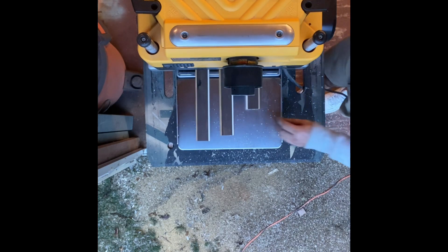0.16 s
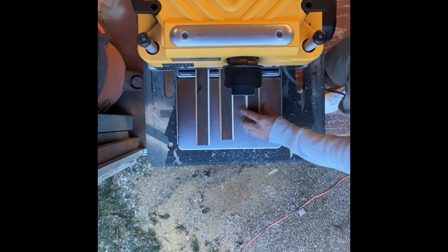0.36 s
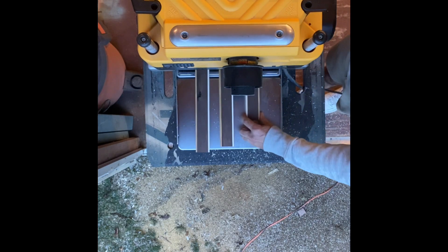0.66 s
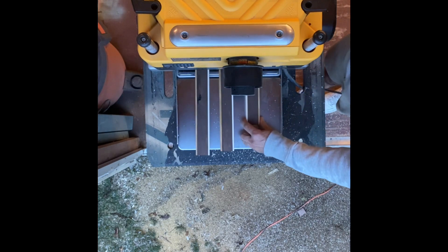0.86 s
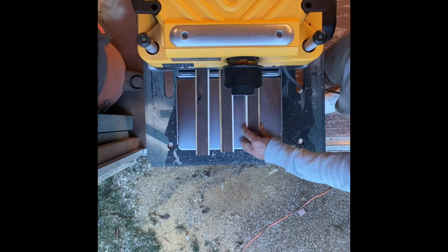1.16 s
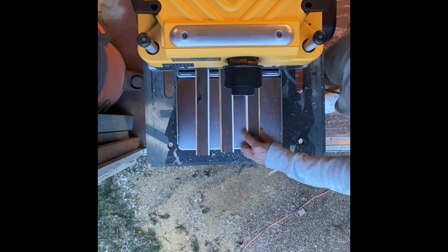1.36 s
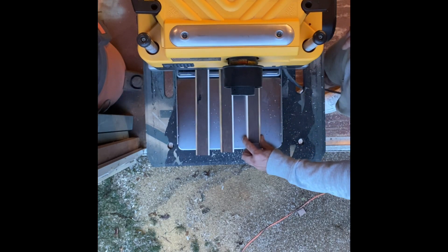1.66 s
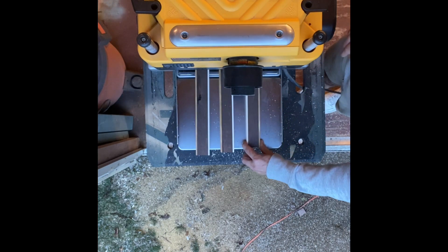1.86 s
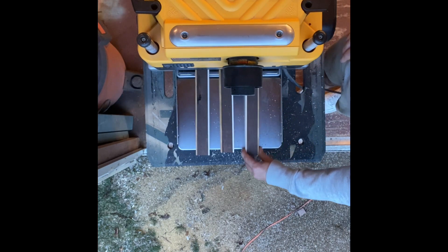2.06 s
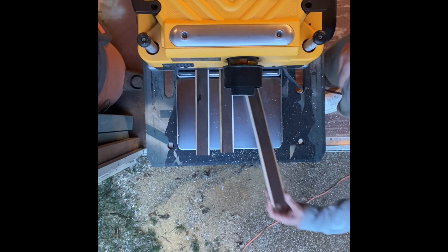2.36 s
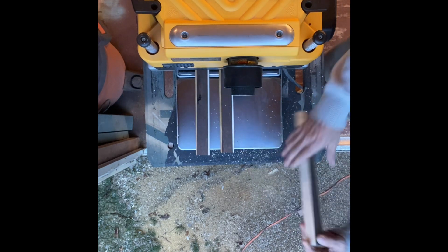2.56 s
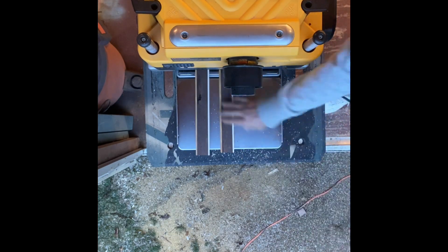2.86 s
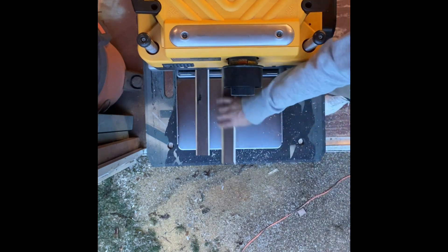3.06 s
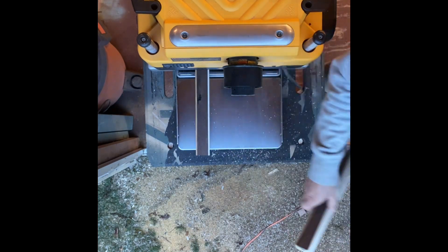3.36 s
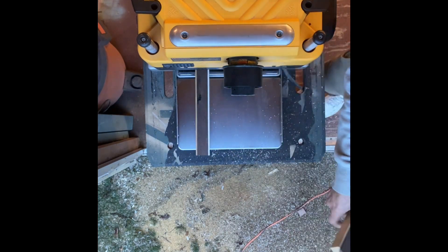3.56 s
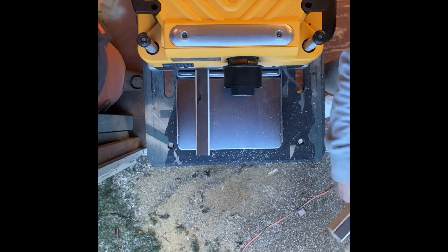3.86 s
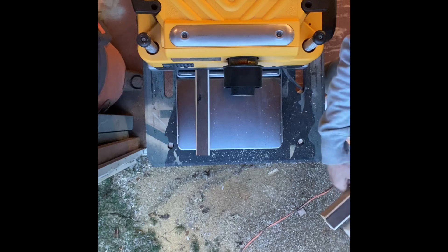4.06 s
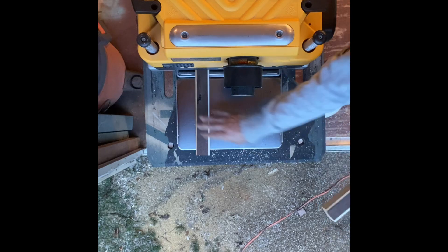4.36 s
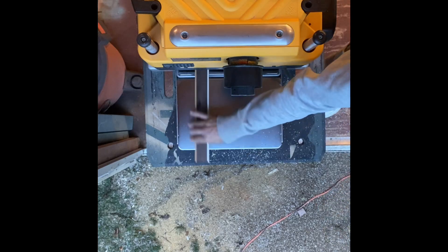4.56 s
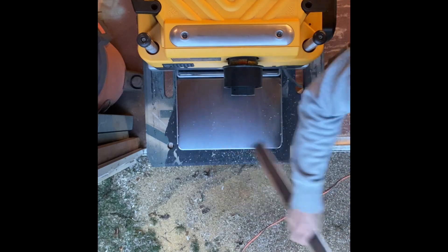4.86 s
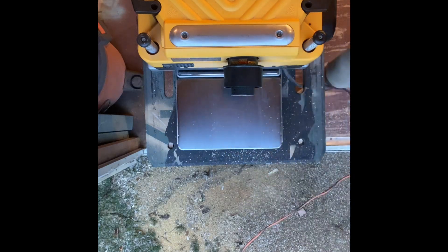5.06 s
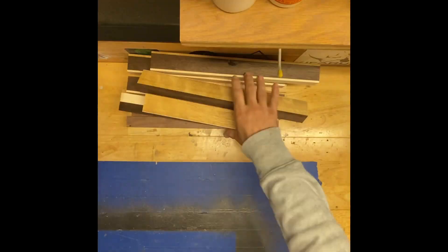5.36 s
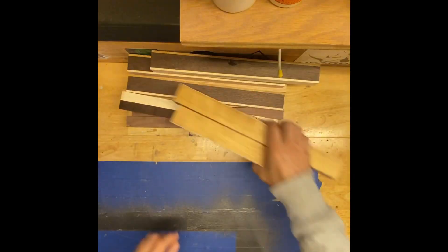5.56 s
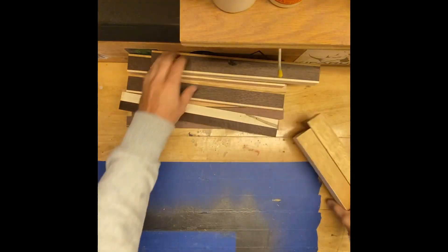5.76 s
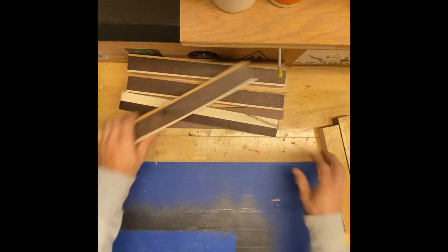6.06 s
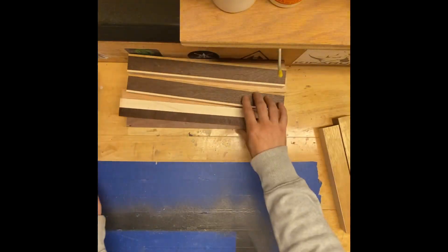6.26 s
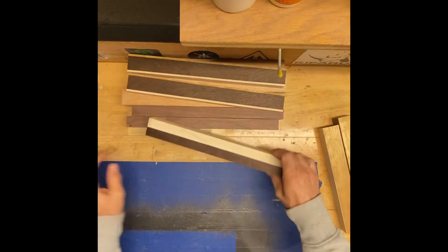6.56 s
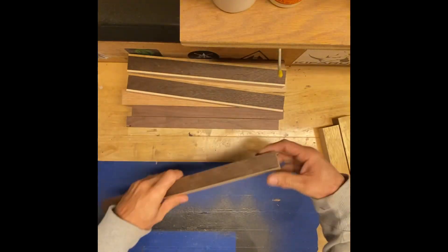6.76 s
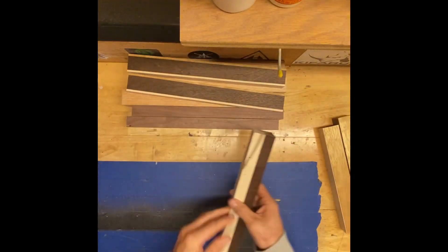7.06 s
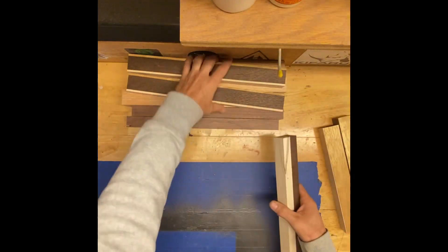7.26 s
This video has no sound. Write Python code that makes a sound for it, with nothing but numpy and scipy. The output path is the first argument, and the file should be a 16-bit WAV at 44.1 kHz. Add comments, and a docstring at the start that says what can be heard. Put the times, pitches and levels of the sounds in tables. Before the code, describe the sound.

Steady loud planer whine with rushing fan air and faint strip scrapes, suddenly replaced by hushed room tone and crisp, irregular wooden clacks.

```python
"""A benchtop thickness planer runs outdoors, heard from just above: three knives drone, the motor whines, the fan roars.
The scene then changes abruptly to a quiet workshop, where hardwood strips are slid, stacked and dropped on a bench.
Rotating parts are sines of wandering phase and level; moving air is shaped noise filtered by resonances.
Impacts are short noise and decaying modes; friction is band-passed grainy noise; both excite the room's echoes."""
import sys
import numpy as np
from scipy import signal
from scipy.fft import rfft, irfft
from scipy.io import wavfile

SR = 44100
rng = np.random.default_rng(int(sys.argv[2]) if len(sys.argv) > 2 else 0)


def to_wav(s):
    """Save 16-bit WAV."""
    ch = np.atleast_2d(s).T  # columns
    pcm = np.round(np.clip(ch, -1, 1) * 32767)  # PCM
    wavfile.write(sys.argv[1], SR, pcm.astype(np.int16))


N = 326781
TIME = np.arange(N) / SR
FREQ = np.fft.rfftfreq(N, 1 / SR)

# modes of the stack of strips and the bench: f/Hz, level/dB, t60/s
WOOD_MODES = [(134, -9.5, 0.055), (220, -11, 0.032), (315, -9, 0.036), (427, -5.5, 0.031), (623, -1, 0.01),
              (740, -2, 0.013), (940, -11, 0.028), (1180, -4, 0.016), (1632, -4.5, 0.018),
              (1810, 2.5, 0.01), (3700, 2, 0.015), (4130, -5, 0.027), (5660, 6, 0.0034), (6540, 1, 0.0062)]


def amp(db):
    """Level and amplitude: decibels to gain."""
    return np.exp(np.asarray(db) * (np.log(10) / 20))


def curves(table):
    """Linear interpolation: the columns of a table of (t/s, ..) rows, one value per sample."""
    s, *columns = np.transpose(table)
    return [np.interp(TIME, s, c) for c in columns]


def walk(rate):
    """Low-passed random process: smooth chance with spread 1 that changes about rate times a second."""
    step = 32  # samples between computed values
    coarse = TIME[::step]
    hz = np.fft.rfftfreq(len(coarse), step / SR)
    spectrum = rfft(rng.standard_normal(len(coarse))) * np.exp(-(hz / rate) ** 2)
    x = irfft(spectrum, len(coarse))
    return np.interp(TIME, coarse, x / x.std())


def band(x, lo_hz, hi_hz, order=2):
    """Band limitation: a causal Butterworth band-pass."""
    edges = [lo_hz, min(hi_hz, .45 * SR)]
    return signal.sosfilt(signal.butter(order, edges, "band", fs=SR, output="sos"), x)


def noise(points, lift_db=0):
    """Spectral density: noise shaped by (f/Hz, level/dB per Hz) points, joined over log frequency."""
    hz, db = np.transpose(points)
    shape = np.interp(np.log(FREQ + 1), np.log(hz), db) + lift_db
    return irfft(rfft(rng.standard_normal(N)) * amp(shape), N) * np.sqrt(SR / 2)


def wide(centre, sides):
    """Sum and difference: left and right from centre and sides."""
    return np.array([centre + sides, centre - sides])


def tone(phase, db, lag=0, pan_db=0):
    """Interaural difference: a sine of given rms level, with a phase lag and level step between the ears."""
    level = amp(db + wide(0, pan_db / 2)[:, None])
    return np.sqrt(2) * level * np.sin(phase + wide(0, lag / 2)[:, None])


def swells(table):
    """Amplitude envelope: Gaussian strokes from (t/s of the peak, length/s, level/dB) rows."""
    return sum(amp(db) * np.exp(-(2 * (TIME - s) / length) ** 2) for s, length, db in table)


def cutter_head(knife_phase):
    """Periodic air chopping: three knives sound harmonics, turbulence shakes them, unbalance hums once a turn."""
    # the knives' drone: t/s, level/dB
    drone_levels = [(0, -22), (.6, -21), (1.2, -19), (2.1, -20.5), (2.65, -19.5), (3.0, -23), (4.8, -23),
                    (5.12, -25.5)]
    # knife harmonics: t/s, second level/dB, third level/dB, fourth level/dB
    overtone_levels = [(0, -42, -35.5, -40), (.45, -48, -37, -40.5), (.85, -45, -34, -57),
                       (1.1, -43, -34, -39), (1.35, -39, -35.5, -36), (1.95, -38.5, -36.5, -31.5),
                       (2.35, -43, -39, -37.5), (2.85, -36.5, -34.5, -36.5), (3.1, -42, -33.5, -39.5),
                       (3.35, -40, -34.5, -37), (4.15, -39.5, -34, -35.5), (4.6, -44, -36.5, -39),
                       (4.8, -38, -44, -39), (5, -36, -37, -36)]
    (drone_db,) = curves(drone_levels)
    second_db, third_db, fourth_db = curves(overtone_levels)
    out = tone(knife_phase / 3, -43 + .5 * walk(8.4))
    out += tone(knife_phase, drone_db + 0.5 * walk(49), lag=0.092, pan_db=-2)
    out += tone(2 * knife_phase, second_db + 3 * walk(22), -0.8, -12.5)
    out += tone(3 * knife_phase, third_db + 1.15 * walk(19), -1.03, 2.0)
    return out + tone(4 * knife_phase, fourth_db + 2.0 * walk(34), 1.88, -3.0)


def motor(knife_phase, load):
    """Shaft harmonics: an unsteady hum, and a whine of fan blades and commutator that grows with the load."""
    # whine running free: multiple of shaft rate, level/dB, added by full load/dB, lag between ears/rad
    motor_lines = [(8, -47, 6.5, 1.47), (16, -40.5, 4.5, 1.34), (21, -47.5, 7.5, -.72)]
    # swelling and fading of the whine: t/s, level change/dB
    whine_levels = [(0, -1.5), (.8, 1.5), (1.1, 0.5), (1.35, -7), (1.6, -3), (1.9, -0.5), (2.7, 4),
                    (2.95, -2.5), (3.15, 1.5), (4.3, 0.5), (4.7, -1), (4.85, 2), (4.95, -1), (5.1, 0)]
    motor_per_knife = .65155  # belt ratio: motor turns per knife passage
    flutter_db, jitter_rad = 2.2, .4  # spread of the whine running free
    (whine_db,) = curves(whine_levels)
    shaft = motor_per_knife * knife_phase + 0.02 * walk(21)
    out = tone(shaft + 0.31 * walk(6.0), -35.5 + 2.0 * walk(32.0), 0, 0.97)
    unsteady = 1 - .6 * load  # the load steadies the whine
    for multiple, db, load_db, lag in motor_lines:
        phase = multiple * shaft + unsteady * jitter_rad * walk(24)
        level_db = db + load_db * load ** 3 + whine_db + unsteady * flutter_db * walk(17.0)
        out += tone(phase, level_db, lag)
    mains = 2 * np.pi * 120 * TIME
    return out + tone(mains + 0.38 * walk(4.4), -53.0)


def arm_echo(x, lag_s=.002, reach=0.189, echo_db=-15):
    """Comb interference: sound bounces off an arm moving over the table, so the roar's colour keeps shifting."""
    late = TIME - lag_s * np.exp(reach * walk(0.68))
    return x + amp(echo_db) * np.array([np.interp(late, TIME, ear) for ear in x])


def fan(ring_hz=2920, ring_width_hz=260):
    """Resonant filtering: air rushes through the housing; one ring comes and goes; roar and hiss flutter apart."""
    # centre air noise before the housing: f/Hz, level/dB per Hz
    air_centre = [(35, -93), (70, -78), (130, -77.5), (200, -67.5), (330, -60.5), (700, -66.5),
                  (1100, -67.5), (2300, -68.5), (4600, -73), (6500, -70), (9500, -76.5), (11700, -87.5),
                  (12400, -106), (13000, -122)]
    # side air noise before the housing: f/Hz, level/dB per Hz
    air_sides = [(35, -120), (120, -99), (210, -94), (340, -73), (600, -67), (1500, -73.5), (2500, -60.5),
                 (4000, -76.5), (5200, -90), (6100, -104), (8000, -77.5), (13600, -83.5), (15000, -126)]
    # resonances and notches of housing and chip chute: f/Hz, width/Hz, level/dB
    housing_modes = [(263, 69, 7), (407, 42, 4), (713, 45, -13.5), (772, 225, 6), (1039, 115, 10),
                     (1251, 83, 9.5), (1785, 130, 5.5), (2051, 55, 8), (2234, 200, -11), (2913, 89, 11.5),
                     (3240, 170, -4.5), (3685, 490, 5), (4072, 135, 8.5), (5380, 500, 4), (6050, 360, 4.5),
                     (7220, 75, -8), (7250, 290, 5)]
    # the housing's ring near 2.9 kHz: t/s, level change/dB
    ring_levels = [(0, -0.5), (.5, -3), (1.4, -2), (2.22, -3), (2.37, 1), (2.85, -0.5), (3.05, -1.5),
                   (4.3, -2), (4.7, -3.5), (5.1, 2)]
    housing_db = sum(db * 2 ** -(2 * (FREQ - hz) / width) ** 2 for hz, width, db in housing_modes)
    side_db = np.maximum(housing_db, 0)  # the notches lie straight ahead only
    air = wide(noise(air_centre, housing_db), noise(air_sides, side_db))
    spectrum = rfft(air)
    roar = irfft(spectrum / (1 + (FREQ / 2400) ** 4), N)
    hiss = air - roar
    ring = irfft(spectrum * 2 ** -(2 * (FREQ - ring_hz) / ring_width_hz) ** 2, N)
    out = roar * amp(-0.3 + 0.14 * walk(24)) + hiss * amp(-0.53 + 0.58 * walk(24.0))
    (ring_db,) = curves(ring_levels)
    out += ring * (amp(ring_db) - 1)
    return arm_echo(out) * amp(wide(0, -0.2))[:, None]


def drags(hiss_db=-5, grain_db=3):
    """Sliding friction: strips pulled over the outfeed table give a grainy rasp and hiss; scuffs only hiss."""
    # finished strips dragged off the steel table: t/s, length/s, level/dB
    drag_strokes = [(2.24, 0.2, -39), (2.86, 0.22, -38), (4.69, 0.18, -34.5)]
    # light scuffs of handled strips: t/s, length/s, level/dB
    scuff_strokes = [(3.15, .08, -36), (4.33, .12, -32.5)]
    grain = wide(rng.standard_normal(N), 0.12 * rng.standard_normal(N))
    grain = grain * amp(grain_db * np.tanh(walk(150)))
    rasp, hiss = band(grain, 2170, 2940), band(grain, 5800, 7000)
    scuff = band(grain, 3400, 7300, order=4)
    dragging = rasp / rasp.std() + amp(hiss_db) * hiss / hiss.std()
    return swells(drag_strokes) * dragging + swells(scuff_strokes) * scuff / scuff.std()


def table_bump(s=4.49, hz=52, t60=0.32, db=-47, scuff_s=0.18, scuff_db=-33):
    """Damped oscillation: a hand scuffs onto the last strip and nudges the outfeed table."""
    t = np.maximum(TIME - s, 0)
    scuff = band(rng.standard_normal(N), 710, 980)
    nudge = tone(2 * np.pi * hz * t, db - 60 * t / t60)
    return nudge + swells([(s, scuff_s, scuff_db)]) * scuff / scuff.std()


def planer():
    """Speed under load: the cut holds head and motor back; as strips leave the knives both turn a little faster."""
    free_knife_hz, load_sag_hz = 490.3, 5.1  # knife passages per second
    unload_s, recover_s = .85, .6  # start and time constant of the unloading
    load = np.exp(-np.maximum(TIME - unload_s, 0) / recover_s)
    knife_hz = free_knife_hz - load_sag_hz * load + 0.2164 * walk(6.06)
    knife_phase = 2 * np.pi * np.cumsum(knife_hz) / SR
    machine = cutter_head(knife_phase) + motor(knife_phase, load) + fan()
    return machine + drags() + table_bump()


def shop_air(sway_db=1.5, sway_rate=5):
    """Band-wise modulation: steady hiss, with low and middle sound that swells and sinks unevenly."""
    # workshop background, centre: f/Hz, level/dB per Hz before the sway
    shop_centre = [(35, -108), (120, -66.5), (250, -72.5), (680, -92), (850, -85), (1000, -96),
                   (1400, -91.5), (1750, -86.5), (2050, -93.5), (2350, -92), (2800, -106), (4100, -95.5),
                   (4700, -107), (5350, -103), (5900, -109), (7400, -101), (8600, -111), (10700, -91),
                   (13000, -119)]
    # workshop background, sides: f/Hz, level/dB per Hz before the sway
    shop_sides = [(35, -119), (120, -75), (200, -100), (680, -95), (860, -85), (1000, -93), (2700, -91),
                  (6200, -106), (7400, -106), (8500, -124), (10700, -95.5), (12500, -116)]
    air = wide(noise(shop_centre), noise(shop_sides))
    spectrum = rfft(air)
    low, below_hiss = (irfft(spectrum / (1 + (FREQ / hz) ** 4), N) for hz in (450, 5000))
    middle, hiss = below_hiss - low, air - below_hiss
    low_sway, middle_sway = (amp(sway_db * walk(sway_rate) - .5) for _ in range(2))
    return hiss + low * low_sway + middle * middle_sway


def shop_tone():
    """Frequency modulation: a faint tone wavers in pitch and level."""
    # course of the tone: t/s, f/Hz
    tone_course = [(5.2, 805), (5.7, 830), (6.1, 790), (6.7, 840), (7.2, 900)]
    hz = curves(tone_course)[0] + 10 * walk(25)
    return tone(2 * np.pi * np.cumsum(hz) / SR, -63 + 2.5 * walk(6), .8)


def bench_bumps(push_s=0.0042):
    """Modal excitation: soft pushes ring the bench top's lowest mode, a little differently at each place."""
    # dull bumps of a hand or a strip's end on the bench: t/s, level/dB
    bump_events = [(5.225, -40), (5.40, -35), (5.64, -38), (5.795, -30), (5.836, -27), (5.888, -30),
                   (5.974, -31), (6.183, -30), (6.265, -33)]
    bench_hz, bench_t60 = 135, 0.11
    out = 0
    for s, db in bump_events:
        t = np.maximum(TIME - s, 0)
        hz = bench_hz * (1 + 0.088 * rng.standard_normal())
        ring = tone(2 * np.pi * hz * t, db - 60 * t / bench_t60)
        out = out + ring * (1 - np.exp(-t / push_s))
    return out


def room(x):
    """Early reflection and reverberation: near surfaces answer at once; the tail is longest, least wide in bass."""
    t = np.arange(SR // 3) / SR
    response = 0
    # lower edge/Hz, upper edge/Hz, early level/dB, tail level/dB, tail t60/s, width
    for lo_hz, hi_hz, early_db, tail_db, t60, width in [
            (87.5, 450, -73, -38.0, 0.41, 0.042),
            (300, 4700, -34.5, -64, 0.19, 0.36),
            (2720, 11000, -39.5, -53.5, 0.3, 1.0)]:
        # fresh noise at each call: every place of contact has its own echoes
        scatter = wide(rng.standard_normal(len(t)), width * rng.standard_normal(len(t)))
        decay = amp(early_db - 60 * t / 0.12) + amp(tail_db - 60 * t / t60)
        response = response + band(scatter, lo_hz, hi_hz) * decay
    response = response * np.clip(t / 0.0019 - 1, 0, 1)  # path delay
    direct = np.pad(x, ((0, 0), (0, len(t) - 1)))
    return direct + signal.fftconvolve(x, response, axes=1)


def taps(taps_per_s=70):
    """Impulse response: edges of strips catch in a random train of taps that ring the stack's modes; rms 1."""
    starts = (rng.random(N) < taps_per_s / SR) * rng.random(N)
    t = np.arange(SR // 20) / SR
    ring = sum(amp(db - 60 * t / t60) * np.sin(2 * np.pi * hz * t) for hz, db, t60 in WOOD_MODES)
    train = band(signal.fftconvolve(starts, ring)[:N], 410, 1730)
    return train / train.std()


def rubbing():
    """Friction excitation: rubbing strips shake the bench, squeak in bending modes and tap; cloth rustles."""
    # strips pushed about: t/s, length/s, rub level/dB, bench rumble over rub/dB (more as the hand bears down)
    slide_strokes = [(5.35, 0.13, -52, 5), (5.435, 0.038, -41.5, -2), (5.507, 0.11, -57, 6),
                     (5.65, 0.16, -60, 16), (5.806, 0.055, -47, 2), (5.994, 0.083, -54.5, 13),
                     (6.25, 0.12, -49, 12), (6.37, 0.049, -41, -5), (6.42, 0.074, -47, -1),
                     (6.5, 0.076, -51, -8), (6.62, 0.034, -44.5, -16), (7.305, .016, -36, -12),
                     (7.345, 0.022, -53, -14), (7.37, 0.085, -44, 2)]
    # a gripped strip sticks and slips on its neighbour: t/s, length/s, level/dB
    squeak_strokes = [(5.432, 0.02, -29.5), (5.449, 0.008, -21)]
    # sleeves and fingers brushing the wood: t/s, length/s, level/dB
    rustle_strokes = [(5.325, 0.081, -58), (6.44, 0.035, -54), (6.69, .03, -63), (6.76, 0.032, -60),
                      (6.87, 0.046, -74), (7.12, 0.066, -67), (7.26, .03, -66)]
    grain = wide(rng.standard_normal(N), 0.12 * rng.standard_normal(N)) * amp(2.4 * walk(300))
    bending = band(grain, 1620, 1830) + amp(-10) * band(grain, 4020, 4110)
    low_bands = band(grain, 102, 151.0), band(grain, 270, 660)
    voices = *low_bands, band(grain, 2100, 4200), bending, band(grain, 3000, 6500)
    rumble, rub, hiss, squeak, cloth = (voice / voice.std() for voice in voices)
    sliding = swells([(s, length, db) for s, length, db, _ in slide_strokes])
    pressing = swells([(s, length, db + press_db) for s, length, db, press_db in slide_strokes])
    friction = rub + amp(-15) * hiss + amp(-3) * taps()
    squeaking = swells(squeak_strokes) * (squeak + amp(-10) * hiss)
    return pressing * rumble + sliding * friction + squeaking + swells(rustle_strokes) * cloth


def clack(thump_db, body_db, tick_db, ring_hz, ring_t60, ring_db, upper_hz, upper_db, pan_db,
          crack_db=0.5, crack_t60=0.02, upper_t60=0.015, ring_lag=1.33, contact_s=0.00047):
    """Modal impact: a blow rings stack and strip over a short crack; hardness shares out lows and highs."""
    t = np.arange(SR // 6) / SR
    crack = wide(rng.standard_normal(len(t)), 0.46 * rng.standard_normal(len(t)))
    chatter = amp(-21 - 60 * t / 0.17)  # the loose stack chatters on after the blow
    out = crack * (amp(crack_db - 60 * t / crack_t60) + chatter)
    ring_phase = 2 * np.pi * ring_hz * t + wide(0, ring_lag / 2)[:, None]
    out += amp(ring_db - 60 * t / ring_t60) * np.sin(ring_phase)
    upper_phase = 2 * np.pi * upper_hz * t + wide(0, 0.83)[:, None]
    out += amp(upper_db - 60 * t / upper_t60) * np.sin(upper_phase)
    for hz, db, t60 in WOOD_MODES:
        detune, size, lag, start = rng.standard_normal(4)
        ear_phase = wide(0, lag * min(hz / 2600, .8))[:, None]
        phase = 2 * np.pi * hz * (1 + 0.029 * detune) * t + start + ear_phase
        out += amp(db + 2 * size - 60 * t / t60) * np.sin(phase)
    out *= 1 - np.exp(-t / contact_s)  # flat faces take a moment to meet
    parts = band(out, 170.0, 560), band(out, 720, 1990, order=3), band(out, 2600, 7150, order=3)
    levels_db = thump_db, body_db + 1.5, tick_db + 0.5
    attack = int(.006 * SR)  # each part's level is set over these first samples
    out = sum(part * amp(db) / part[:, :attack].std() for part, db in zip(parts, levels_db))
    return out * amp(wide(0, pan_db / 2))[:, None]


def snap(db, length_s=0.0022, tail_db=-20, t60=0.26):
    """Brief contact: a sharp corner's bright click and three short rings, scattered by things on the bench."""
    t = np.arange(SR // 5) / SR
    scatter = wide(rng.standard_normal(len(t)), 1.4 * rng.standard_normal(len(t)))
    click = band(scatter, 1800, 9800, order=3)
    rings = amp(-3.0) * np.sin(2 * np.pi * 3480 * t) + amp(-1) * np.sin(2 * np.pi * 3950 * t)
    rings = rings + amp(-15) * np.sin(2 * np.pi * 7950 * t + wide(0, 0.8)[:, None])
    contact = np.exp(-(t / length_s - 1) ** 2)
    tail = click * amp(tail_db - 60 * t / t60)
    return amp(db) * ((amp(-1) * click + rings) * contact + tail)


def knocks():
    """Impact and rebound: strips land on each other, some with one weaker, softer rebound; sharp corners click."""
    # hard edges clicking together: t/s, level/dB
    snap_events = [(6.019, -48), (6.337, -43), (7.3127, -13)]
    # wood on wood: t/s, level/dB, hardness as treble over body/dB, main ring f/Hz, its t60/s, its level/dB,
    # upper ring f/Hz, its level/dB, rebound after/s (0 for none), left minus right/dB
    clack_events = [(5.4525, -14, -3, 1660, 0.0089, 11, 4080, 16, 0.00076, 2),
                    (5.4549, -11, -18, 1640, 0.012, 16.5, 4100, 5, 0, -2),
                    (5.7057, -18, -8, 1800, 0.013, 9, 4180, 6.5, 0, -1),
                    (5.792, -54, -25, 1500, .02, 0, 3900, 3, 0.002, -2),
                    (5.805, -52, -22, 1599, .012, -4, 4505, 5, 0.00026, -4),
                    (5.8472, -27, -7, 1060, 0.015, 2, 3730, 18, 0.0044, 1),
                    (5.8574, -28, -17, 1650, 0.0061, 0, 3630, 6, 0.0073, -1),
                    (5.8865, -26, -3, 1700, 0.012, 11, 3740, 10, 0.00019, 2),
                    (5.8904, -15.5, -2, 2367, 0.027, 10.5, 3950, 2, 0.0041, -5),
                    (5.9001, -22.5, -1.5, 2200, 0.025, 1, 5130, 2, .008, 0),
                    (6.1813, -19, -3, 1767, 0.016, 7, 4090, 7, 0.00098, 0),
                    (6.2032, -27.5, -9, 1760, .016, 3, 3990, 6, 0.0013, -2),
                    (6.278, -49, -20, 1402, .015, -2, 4100, 5, 0, -5),
                    (6.3376, -32, -5, 1680, 0.0092, 4, 3650, -5, 0, -2),
                    (6.3412, -31, -15, 1350, 0.014, 5, 3650, 0, 0, -3),
                    (6.366, -41, -16, 800, 0.018, 4, 3650, 2, 0, -3),
                    (6.405, -43, -20, 1282, 0.023, 4, 3800, 5, 0.001, -3),
                    (6.4545, -35.5, -6, 1740, .01, -9, 4000, 24, 0.0043, -2),
                    (6.499, -51, -14, 1590, .015, -2, 4050, 10, 0.00067, -4),
                    (6.524, -52, -22, 899, .015, 3, 3900, 2, 0, -4),
                    (6.5957, -26, -7.5, 1830, 0.01, 8, 4050, 15, 0.0015, -1),
                    (7.258, -48, -21, 1730, 0.031, -9, 4046, 6, .006, -2),
                    (7.2955, -32.5, -17, 1314, 0.021, 9, 3684, 3, 0.00042, 1),
                    (7.304, -38, 1, 1402, .02, 3, 3600, 10, 0.0035, 0),
                    (7.313, -30, 6, 1860, 0.011, 11, 3960, 9, 0.005, -2),
                    (7.322, -34, 7, 1500, .015, 3, 3503, 10, 0, 0),
                    (7.34, -40, 10, 1690, .015, 3, 5300, 6, 0.014, 0),
                    (7.3613, -25, -7, 1500, 0.022, 7, 3670, 3, 0.00018, -1.5),
                    (7.369, -31, -0.5, 1650, 0.021, 9, 4330, 8, 0.0023, 0),
                    (7.386, -42, 2, 1700, .015, 2, 3050, 13, 0.0017, -1),
                    (7.395, -41, -4, 1580, 0.018, 4, 3950, 8, .008, -5)]
    blows = [(s, snap(db)) for s, db in snap_events]
    for s, db, hard_db, ring_hz, ring_t60, ring_db, upper_hz, upper_db, rebound_s, pan_db in clack_events:
        contacts = [(s, db, hard_db)]
        if rebound_s > 0:
            contacts.append((s + rebound_s, db - 6, hard_db - 1.5))
        for at, body, hard in contacts:
            # a hard contact or a freely ringing strip passes less to the bench
            thump = body - 6 - 0.26 * hard - 0.43 * ring_db
            blow = clack(thump, body, body + hard, ring_hz, ring_t60, ring_db, upper_hz, upper_db, pan_db)
            blows.append((at, blow))
    out = np.zeros((2, N + SR))
    for s, blow in blows:
        start, sound = int(s * SR), room(blow)
        out[:, start:start + sound.shape[1]] += sound
    return out[:, :N]


def free_strip(start_s=5.892, lag=1.0):
    """Light damping: a strip knocked clear of the stack rings on, clear and lingering."""
    # modes of the free strip: f/Hz, level/dB, t60/s
    strip_modes = [(2340, -23, 0.17), (2880, -39, .12), (3795, -49, .2)]
    t = np.maximum(TIME - start_s, 0)
    ring = sum(tone(2 * np.pi * hz * t, db - 60 * t / t60, lag) for hz, db, t60 in strip_modes)
    return ring * (1 - np.exp(-t / .003))


def ports(x, lo_hz=2700, hi_hz=3050, ring_db=5):
    """Antiphase resonance: the two microphone ports ring against each other in one narrow band."""
    return x + wide(0, amp(ring_db) * band(x.mean(axis=0), lo_hz, hi_hz, order=1))


def scene():
    """Superposition: the planer fades out within a few hundredths of a second and the workshop takes over."""
    change_s = 5.16
    outdoors = np.clip((change_s - TIME) / 0.037, 0, 1)
    indoors = np.clip((TIME - change_s) / 0.032, 0, 1)
    handling = knocks() + room(rubbing())[:, :N] + free_strip() + bench_bumps()
    return outdoors * planer() + indoors * (ports(handling) + shop_air() + shop_tone())


def record(dry):
    """Saturation and band limit: the microphone rounds the highest peaks and cuts the top."""
    low_pass = signal.ellip(8, .2, 70, 15600, fs=SR, output="sos")  # ripple/dB, stopband/dB, edge/Hz
    rounded = dry / (1 + (dry / .95) ** 4) ** .25
    return signal.sosfilt(low_pass, rounded)


dry = scene()
out = record(dry)
to_wav(out)
```